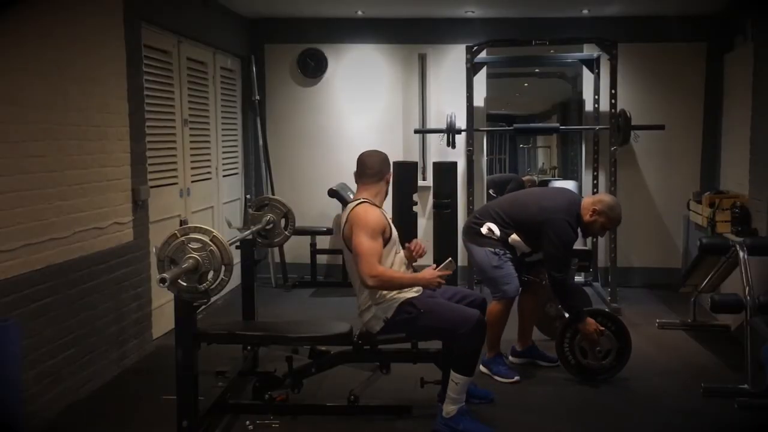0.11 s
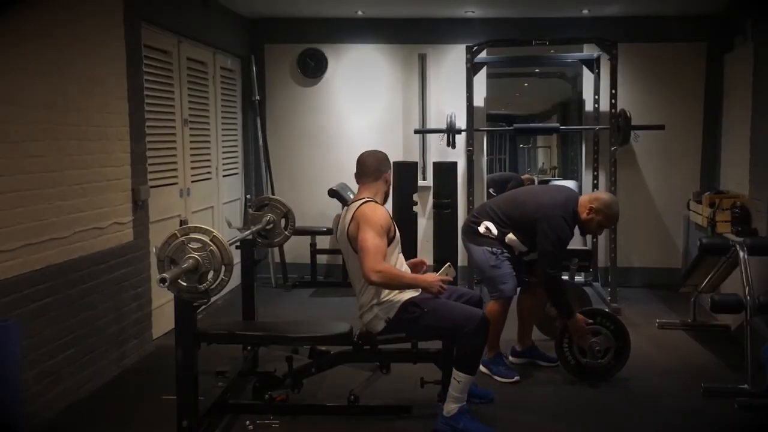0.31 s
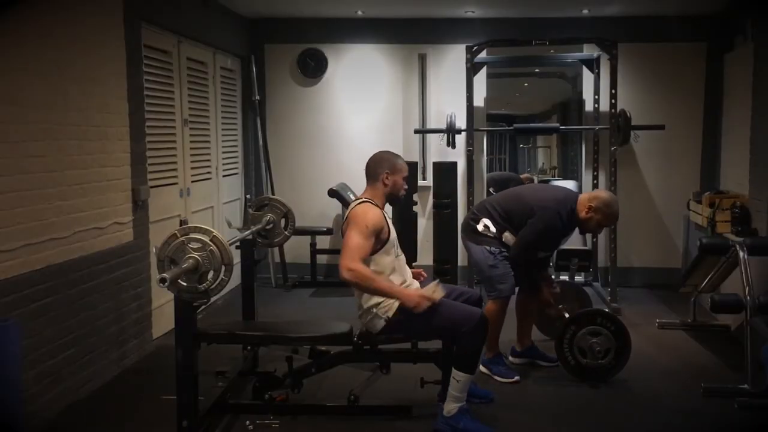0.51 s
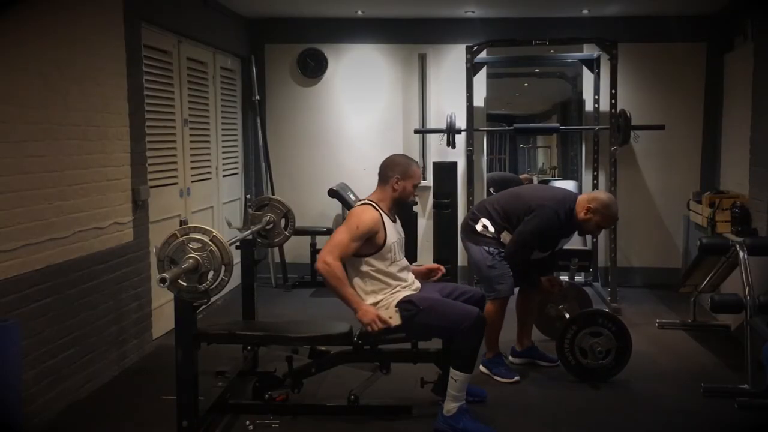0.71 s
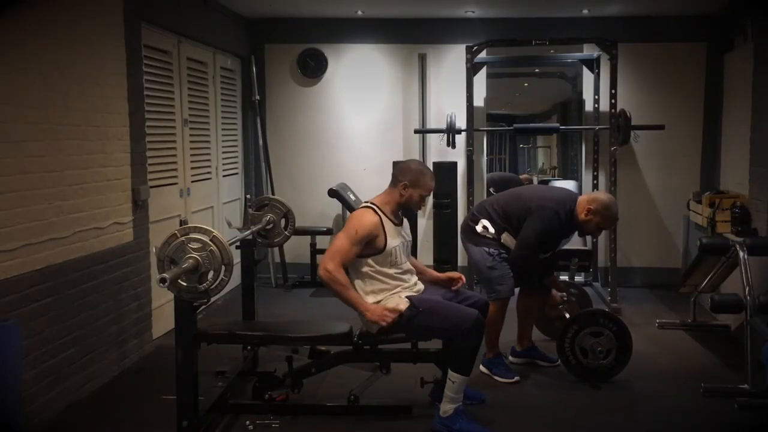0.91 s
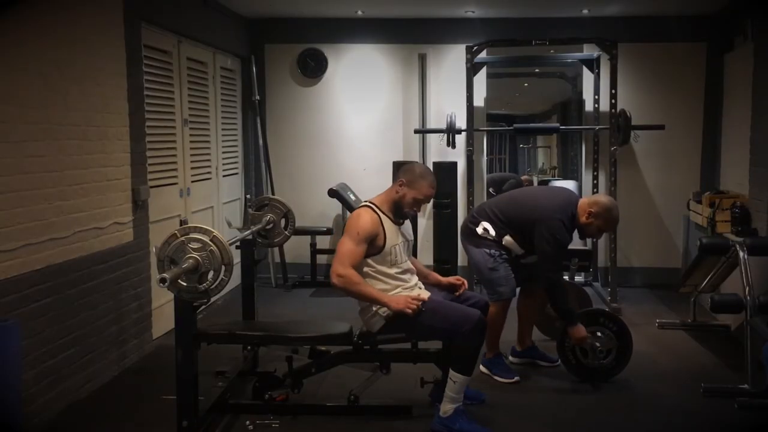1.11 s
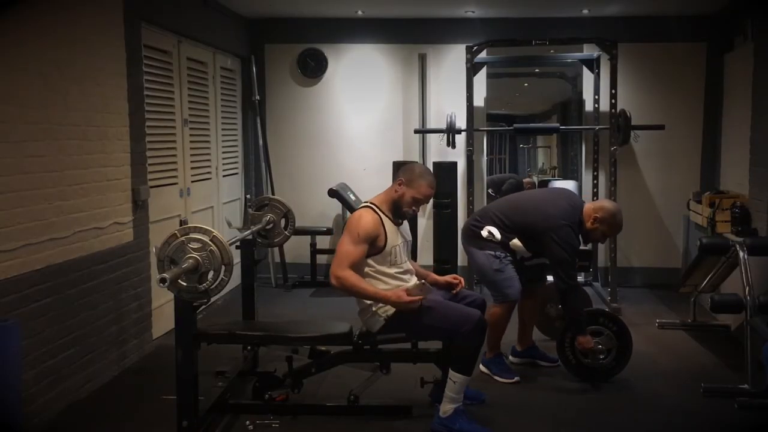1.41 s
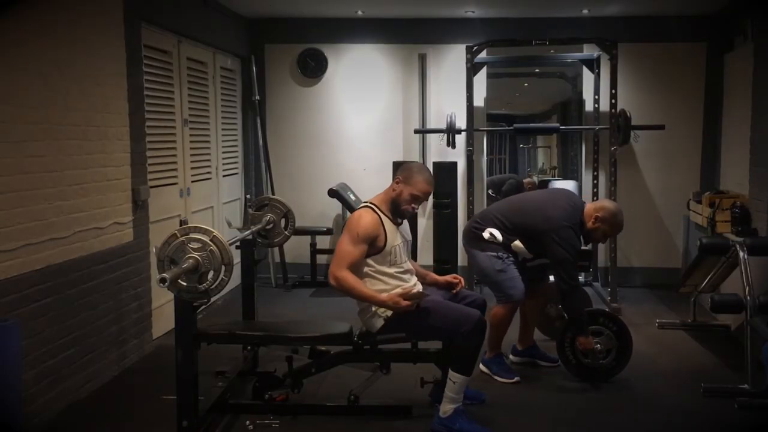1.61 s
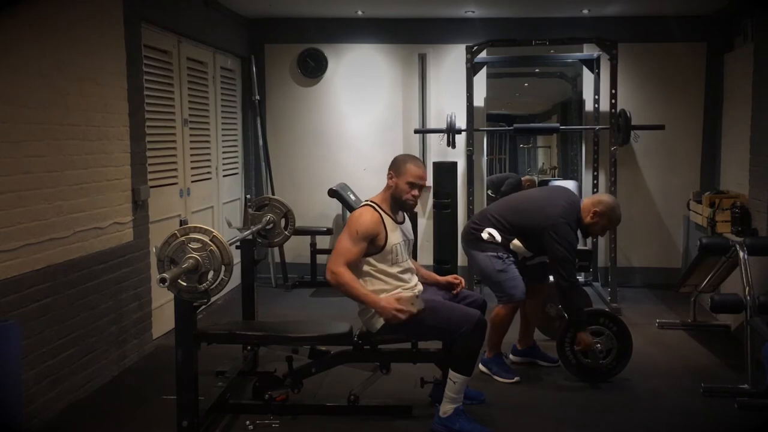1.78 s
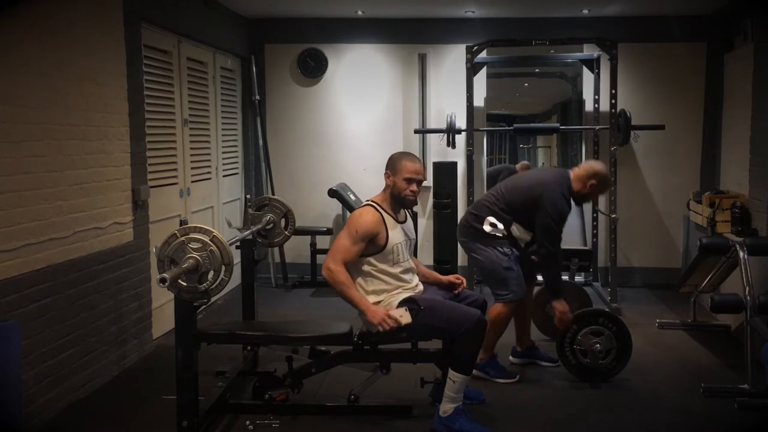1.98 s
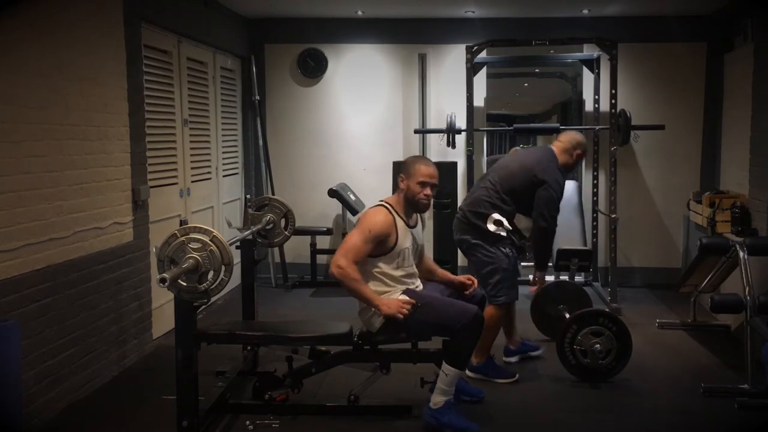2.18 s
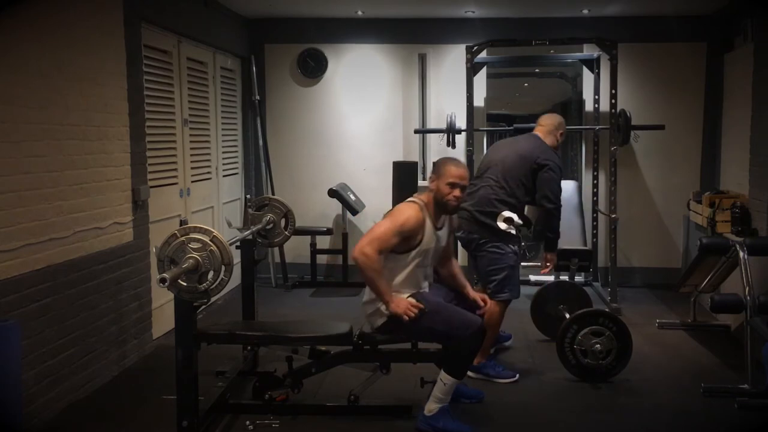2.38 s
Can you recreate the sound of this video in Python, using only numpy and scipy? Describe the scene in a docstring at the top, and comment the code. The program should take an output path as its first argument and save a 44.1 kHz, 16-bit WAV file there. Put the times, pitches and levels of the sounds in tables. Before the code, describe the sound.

A heavy metal plate clank rings out, then lighter steel clinks follow on the bar.

```python
"""Weight plate on a barbell

In a small gym, heard at one microphone, an iron plate scrapes along a barbell sleeve, clanks twice against
its neighbour and rings until damped: decaying modes over bursts of resonant noise. A steel collar clinks
on the sleeve the same way and the plate sings briefly, a swelling sine. Soft footfalls, dull noise bursts,
land on the rubber floor; filtered noise makes the air and shuffling, a wavering sine the ventilation hum.
"""
import sys
import numpy as np
from scipy import signal
from scipy.fft import rfft, irfft, next_fast_len
from scipy.io import wavfile
from scipy.ndimage import uniform_filter1d, minimum_filter1d, map_coordinates

SR = 44100
rng = np.random.default_rng(int(sys.argv[2]) if len(sys.argv) > 2 else 0)


def unload_audio(sound):
    """Save the sound as a 16-bit wav file, at the path given as the first command line argument."""
    columns = np.transpose(np.atleast_2d(sound))
    # keep every value between -1 and 1, then stretch to whole-number steps
    steps = np.round(np.clip(columns, -1, 1) * 32767)
    wavfile.write(sys.argv[1], SR, steps.astype(np.int16))


N = 110250


def amp(db):
    """Decibels to gain."""
    return 10 ** (np.asarray(db) / 20)


def unit(x):
    """Scale to rms 1."""
    return x / np.sqrt(np.mean(x ** 2) + 1e-20)


def along(points, hz):
    """Read (Hz, value) points on a log frequency axis."""
    point_hz, values = np.transpose(points)
    return np.interp(np.log(hz + 1), np.log(point_hz + 1), values)


def clock():
    """Seconds, one value per sample."""
    return np.arange(N) / SR


def wobble(rate):
    """A smooth random curve, rate knots a second."""
    return map_coordinates(rng.standard_normal(2048), [clock() * rate + 2], mode="wrap")


def tilted(hz, slope, centre_hz):
    """A slope in dB per octave, zero at the centre and flat from two octaves below it down."""
    return slope * np.log2(np.maximum(hz, centre_hz / 4) / centre_hz)


def noise(colour):
    """Noise of rms 1 whose spectrum follows colour(Hz) in dB."""
    spectrum = rfft(rng.standard_normal(N))
    return unit(irfft(spectrum * amp(colour(np.fft.rfftfreq(N, 1 / SR))), N))


def at(s, x):
    """x starting at s seconds; a negative start cuts off its beginning."""
    k = round(s * SR)
    return np.pad(x, (max(k, 0), max(-k, 0)))[max(-k, 0):][:N]


def ring(modes, colour, blur, blur_rate):
    """Decaying modes; room reflections make each waver in level and phase, the high ones faster."""
    t, out = clock(), np.zeros(N)
    scatter = blur * (1 - np.exp(-t / 0.029))  # reflections build up after the contact
    for hz, db, t60 in modes:
        rate = blur_rate * np.sqrt(hz / 1000)
        knots = np.arange(0, N / SR + 1, 1 / rate)
        random_knots = rng.standard_normal((2048, 2))[:len(knots)] @ [1, 1j]
        chance = np.interp(t, knots, random_knots)
        field = (1 + scatter * chance) / np.sqrt(1 + scatter ** 2)
        wave = np.imag(field * np.exp(2j * np.pi * (hz * t + rng.random())))
        out += amp(db + colour(hz) - 60 * t / t60) * wave
    return out * (1 - np.exp(-t / 0.00017))


def burst(colour, decay, direct_db, direct_s, peaky_db):
    """A contact in the room: crowded fine resonances, a strong start, a tail that dies by frequency."""
    t = clock()

    def peaky_colour(hz):
        fine = map_coordinates(rng.standard_normal(1024), [hz / 30])  # random knots 30 Hz apart
        return colour(hz) + peaky_db * fine

    hz, s, cells = signal.stft(noise(peaky_colour), SR, nperseg=512)
    fade = amp(-60 * s / along(decay, hz)[:, None])
    tail = signal.istft(cells * fade, SR, nperseg=512)[1][:N]
    strong_start = 1 + amp(direct_db) * np.exp(-t / direct_s)
    return tail * strong_start * (1 - np.exp(-t / .0004))


# Plate on plate. Each row: start in seconds, ring level in dB, clash level in dB, tilt in dB per octave.
BLOWS = [(0.232, -22, -23, -0.5), (0.254, -29.5, -26.5, 2)]
# Modes of the plate. Each row: frequency in Hz, relative level in dB, t60 in seconds before damping.
PLATE_MODES = [(336, -21, 0.61), (384, -20, 0.7), (794.7, -7, 1.8), (829.2, -3, 2.05), (873, -17, 1.9),
               (969, -25, 1.0), (1063, -19.5, 2.1), (1283.4, -16, 2.7), (1510, -11, 1.8), (1517, -9, 1.78),
               (1560, -18.5, 1.7), (1965, -22, 1.78), (2460, -22.5, 1.6), (2869, -7.5, 1.37),
               (3424, -22.5, .9), (3908, -22.5, 0.31), (4055, -19, 1.1), (5450, -29, 1.1),
               (6140, -42.5, 0.87), (6670, -34.5, 0.62)]
# Colour of the clash. Each row: frequency in Hz, relative level in dB per Hz.
CLASH_COLOUR = [(29, -61.5), (50, -21.5), (325, -19.5), (444, -23), (622, -28.5), (809, -4), (957, -12),
                (1190, -16.5), (1310, -12.5), (1410, -16), (1550, -10), (1740, -31), (1970, -22),
                (2170, -29.5), (2690, -23), (2890, -13.5), (3100, -27), (4040, -23.5), (5020, -30.5),
                (6080, -25), (15500, -60)]
# How long clash and scrape last in the room. Each row: frequency in Hz, t60 in seconds.
IRON_T60 = [(60, 0.27), (150, 0.93), (400, 0.89), (1100, 1), (3500, 1), (7000, 0.69), (10000, 0.57),
            (14000, 0.17)]
# Bright grinding of the second blow. Each row: frequency in Hz, relative level in dB per Hz.
SPRAY_COLOUR = [(3000, -31), (7000, -6.5), (10000, 3.5), (15500, -7)]
# Low, dull part of the clash. Each row: frequency in Hz, relative level in dB per Hz.
THUMP_COLOUR = [(30, -21.5), (60, -13.5), (110, -5), (180, 2), (300, -4), (500, 0), (700, -12),
                (2000, -50.5)]
EARLY_DB, EARLY_S = 8, 0.094  # extra ring that the touching plates lose quickly
DAMP_AT_S, DAMP_T60_S, DAMP_DB = .76, .25, -5  # a touch muffles the low modes, down to DAMP_DB
HELD_T60_S = 1.8  # added decay of every mode after the touch
SPRAY_DB, SPRAY_T60_S = -41.5, 0.35
THUMP_DB, THUMP_RISE_S, THUMP_T60_S = -36.5, 0.0072, 0.63


def plate_clank():
    """Two quick blows, the second brighter, set the iron's modes ringing until a touch damps them."""
    t, out = clock(), np.zeros(N)
    early = 1 + amp(EARLY_DB) * np.exp(-(t / EARLY_S) ** 2)
    muffle = amp(np.clip(-60 * (t - DAMP_AT_S) / DAMP_T60_S, DAMP_DB, 0))
    held = amp(-60 * np.maximum(t - DAMP_AT_S, 0) / HELD_T60_S)
    low_modes = [mode for mode in PLATE_MODES if mode[0] < 1200]
    high_modes = [mode for mode in PLATE_MODES if mode[0] >= 1200]
    for s, ring_db, clash_db, slope in BLOWS:
        tilt = lambda hz: tilted(hz, slope, 1800)
        colour = lambda hz: along(CLASH_COLOUR, hz) + tilt(hz)
        low = ring(low_modes, tilt, blur=.6, blur_rate=26)
        high = ring(high_modes, tilt, blur=.95, blur_rate=30)
        clash = burst(colour, IRON_T60, direct_db=0.5, direct_s=0.036, peaky_db=4.5)
        out += amp(ring_db) * held * (muffle * at(s, low * early) + at(s, high * early))
        out += amp(clash_db) * at(s, clash)
    spray = amp(SPRAY_DB - 60 * t / SPRAY_T60_S) * noise(lambda hz: along(SPRAY_COLOUR, hz))
    thump = amp(THUMP_DB - 60 * t / THUMP_T60_S) * noise(lambda hz: along(THUMP_COLOUR, hz))
    thump *= 1 - np.exp(-t / THUMP_RISE_S)
    return out + at(BLOWS[-1][0], spray) + at(BLOWS[0][0], thump)


# The plate catching on the sleeve, the first catch already under way at the start.
# Each row: start in seconds, ring level in dB, scrape level in dB, tilt in dB per octave.
CATCHES = [(-0.08, -49, -45.5, -1), (0.156, -48.5, -43, -0.5), (0.186, -36.5, -37, 1),
           (0.2145, -54, -33, -1)]
# Modes that a rub excites. Each row: frequency in Hz, relative level in dB, t60 in seconds.
RUBBED_MODES = [(1353, -3, .9), (1560, -0.5, 0.88), (1987, -0.5, .8), (2390, -12, 1.7), (3800, -8.5, 0.36)]
# Colour of the scrape. Each row: frequency in Hz, relative level in dB per Hz.
SCRAPE_COLOUR = [(120, -63), (200, -9), (422, -17), (690, -6), (992, -8.5), (1510, -5), (1810, -28),
                 (2020, -17), (2420, -20), (3610, -9.5), (5200, -18.5), (7760, -15.5), (8820, -35.5),
                 (9830, -27), (15500, -44)]


def plate_slide():
    """The bore catches on the sleeve, each catch rasping and faintly ringing the plate."""
    out = np.zeros(N)
    onset = 1 - np.exp(-clock() / .004)
    for s, ring_db, scrape_db, slope in CATCHES:
        tilt = lambda hz: tilted(hz, slope, 2500)
        colour = lambda hz: along(SCRAPE_COLOUR, hz) + tilt(hz)
        tone = ring(RUBBED_MODES, tilt, blur=.5, blur_rate=30)
        rasp = burst(colour, IRON_T60, direct_db=-16.5, direct_s=0.014, peaky_db=4)
        out += at(s, (amp(ring_db) * tone + amp(scrape_db) * rasp) * onset)
    return out


# Collar on sleeve. Each row: start in seconds, collar ring level in dB, sleeve ring level in dB,
# click level in dB, tilt in dB per octave, favoured frequency in Hz, its boost in dB.
CLINKS = [(1.339, -49.5, -62, -44, 1.5, 2320, 8), (1.483, -68, -52.5, -41, 3, 9200, 4.5),
          (1.605, -59.5, -61, -53, -1, 4490, 2.5), (1.660, -60.5, -58, -47, 0, 6820, 8),
          (1.799, -78, -72.5, -57, -3.5, 3346, 13.5)]
# Modes of the collar. Each row: frequency in Hz, relative level in dB.
COLLAR_MODES = [(1180, -15), (1550, -5.5), (2277, -4), (3750, -0.5), (4565, -2), (6288, -2), (6580, 3),
                (7117, -1), (8350, -2.5), (9080, -5)]
# Modes of the sleeve. Each row: frequency in Hz, relative level in dB before a random change per clink.
SLEEVE_MODES = [(1288, 4), (2860, -6), (3250, -5), (3720, -0.5), (5405, -3.5), (6045, -2), (6380, -14),
                (6555, -5), (8140, -3), (8344, 1), (8586, -13)]
# Colour of the click. Each row: frequency in Hz, relative level in dB per Hz.
CLICK_COLOUR = [(410, -51), (700, -1.5), (2280, -9.5), (3190, -10.5), (3730, -5.5), (7500, -14),
                (8320, -11.5), (15500, -17)]
# How long the click lasts in the room. Each row: frequency in Hz, t60 in seconds.
CLICK_T60 = [(1000, 1), (4000, 0.89), (7500, 0.8), (13000, .45)]
# The instant of contact. Each row: frequency in Hz, relative level in dB per Hz.
TICK_COLOUR = [(1000, -19.5), (5000, -9), (11000, 1.5), (15500, 1)]
COLLAR_T60_S, SLEEVE_T60_S = .62, .7
FAVOUR_OCT = 0.21  # width in octaves of the range that a contact point favours
CLUSTER_HZ, CLUSTER_DB = 130, 5  # width and height of the crowd of resonances around a mode
TICK_DB, TICK_T60_S = 1, .1  # level against the click, at a click of HARD_CLICK_DB
SNAP_GROWS, HARD_CLICK_DB = .7, -45.5  # harder contacts snap more: extra tick dB per click dB


def clusters(hz):
    """Close resonances crowd around each collar and sleeve mode, a boost in dB."""
    near = [np.exp(-((hz - mode[0]) / CLUSTER_HZ) ** 2) for mode in COLLAR_MODES + SLEEVE_MODES]
    return CLUSTER_DB * np.max(near, axis=0)


def collar():
    """Light steel contacts ring collar and sleeve, each point of contact favouring other modes."""
    t, out = clock(), np.zeros(N)
    collar_modes = [(hz, db, COLLAR_T60_S) for hz, db in COLLAR_MODES]
    for s, collar_db, sleeve_db, click_db, slope, favoured_hz, boost_db in CLINKS:
        def colour(hz):
            octaves = np.log2((hz + 1) / favoured_hz)
            return tilted(hz, slope, 4100) + boost_db * np.exp(-(octaves / FAVOUR_OCT) ** 2)

        click_colour = lambda hz: along(CLICK_COLOUR, hz) + colour(hz) + clusters(hz)
        small = ring(collar_modes, colour, blur=2.5, blur_rate=110)
        sleeve_modes = [(hz, db + rng.normal(0, 2), SLEEVE_T60_S) for hz, db in SLEEVE_MODES]
        large = ring(sleeve_modes, colour, blur=2, blur_rate=55)
        click = burst(click_colour, CLICK_T60, direct_db=-8, direct_s=0.027, peaky_db=3.5)
        snap_db = TICK_DB + SNAP_GROWS * (click_db - HARD_CLICK_DB)
        tick = noise(lambda hz: along(TICK_COLOUR, hz) + colour(hz))
        tick *= amp(snap_db - 60 * t / TICK_T60_S)
        out += at(s, amp(collar_db) * small + amp(sleeve_db) * large + amp(click_db) * (click + tick))
    return out


SING_S, SING_RISE_S = 1.655, .045
SING_HZ, SING_DB, SING_T60_S = 1294, -46.5, 0.54


def plate_sing():
    """One mode of the plate swells as the metal rubs, then fades."""
    t = clock()
    fade = amp(-60 * np.maximum(t - 2 * SING_RISE_S, 0) / SING_T60_S)
    swell = np.minimum(t / SING_RISE_S, 1) * fade
    tone = np.sin(2 * np.pi * SING_HZ * t + 0.28 * wobble(35))
    return amp(SING_DB) * at(SING_S, swell * tone)


# Soft footfalls. Each row: start in seconds, level in dB.
STEPS = [(0.859, -52.5), (0.918, -53), (2.385, -50.5), (2.423, -59), (2.464, -54.5)]
# Colour of a footfall. Each row: frequency in Hz, relative level in dB per Hz.
THUD_COLOUR = [(60, -32), (160, -13), (270, 5.5), (400, -13), (700, -13), (2000, -34.5), (8000, -51)]


def footfalls():
    """Dull thuds on rubber matting: low bursts of noise with a softened start."""
    out = np.zeros(N)
    onset = 1 - np.exp(-clock() / 0.0013)
    thud_t60 = [(200, 0.63), (4000, 0.37)]  # Hz, seconds
    for s, db in STEPS:
        thud = burst(lambda hz: along(THUD_COLOUR, hz), thud_t60, direct_db=1.5, direct_s=0.01, peaky_db=0.5)
        out += amp(db) * at(s, thud * onset)
    return out


# Colour of the room air. Each row: frequency in Hz, relative level in dB per Hz.
AIR_COLOUR = [(15, -39), (25, -18.5), (53, -7), (107, -12), (140, -8), (305, -11), (399, -3.5), (433, -10),
              (614, -12), (666, -12.5), (1850, -23), (2170, -26), (3340, -27.5), (15500, -55.5)]
# Shuffling of clothes and shoes. Each row: time in seconds, level in dB before a random waver.
SHUFFLE_LEVEL = [(0, -60), (0.75, -55), (0.85, -55.5), (1.12, -62), (1.3, -73.5), (1.55, -56.5),
                 (1.97, -63), (2.1, -62.5), (2.22, -59), (2.35, -66.5), (2.5, -70)]
# Colour of the shuffling. Each row: frequency in Hz, relative level in dB per Hz.
CLOTH_COLOUR = [(200, -11), (800, 3.5), (1500, -1.5), (2500, -9), (6000, -17), (10000, -27.5), (15500, -32)]
AIR_DB, HUM_HZ, HUM_DB = -58, 136.6, -61  # the hum wavers around its pitch and level


def background():
    """Room air and quiet shuffling as filtered noise, ventilation hum as a wavering sine."""
    t = clock()
    air = amp(AIR_DB) * noise(lambda hz: along(AIR_COLOUR, hz))
    hum = amp(HUM_DB + 1.1 * wobble(40)) * np.sin(2 * np.pi * HUM_HZ * t + .7 * wobble(36))
    shuffle_db = np.interp(t, *np.transpose(SHUFFLE_LEVEL)) + 1.1 * wobble(45)
    shuffle = amp(shuffle_db) * noise(lambda hz: along(CLOTH_COLOUR, hz))
    return air + hum + shuffle


def scene():
    """Everything at one microphone."""
    metal = plate_slide() + plate_clank() + collar() + plate_sing()
    return (metal + footfalls() + background())[None]


CEILING = 0.53  # limiter threshold, of full scale
TOP_HZ = 15850  # middle of the 300 Hz wide upper band edge


def record(dry):
    """The recorder's fast limiter holds peaks down; nothing passes above the band edge."""
    need = np.minimum(1, CEILING / (abs(dry) + 1e-9))
    gain = uniform_filter1d(minimum_filter1d(need, size=161), size=161)
    m = next_fast_len(N + SR // 2)
    band = np.clip((TOP_HZ - np.fft.rfftfreq(m, 1 / SR)) / 300 + .5, 0, 1)
    return irfft(rfft(dry * gain, m) * band, m)[..., :N]


dry = scene()
out = record(dry)
unload_audio(out)
```